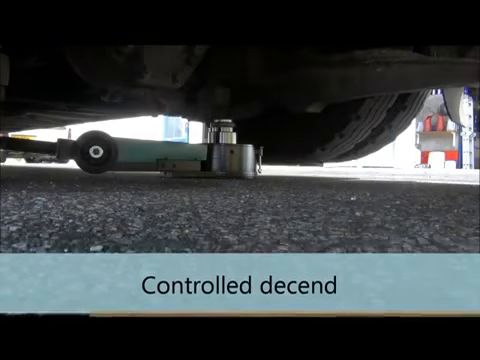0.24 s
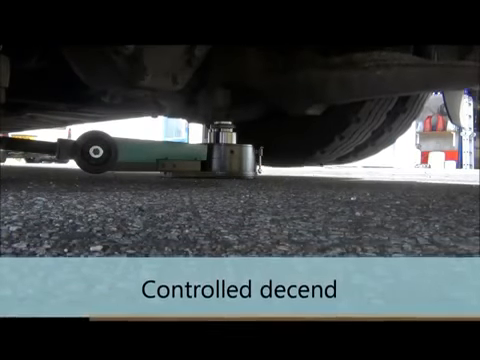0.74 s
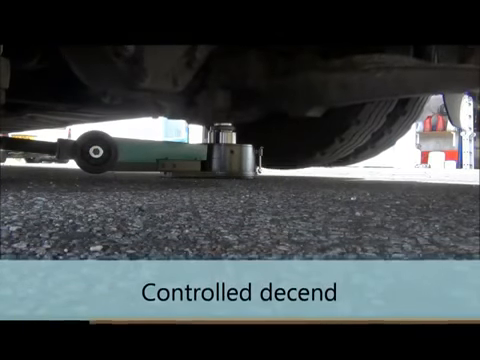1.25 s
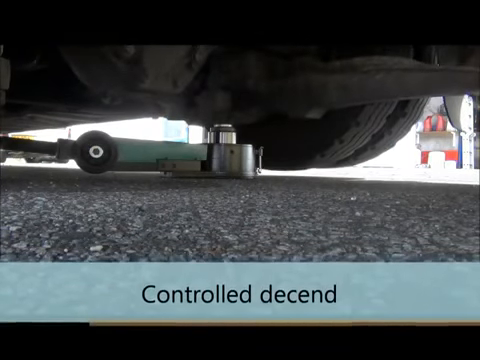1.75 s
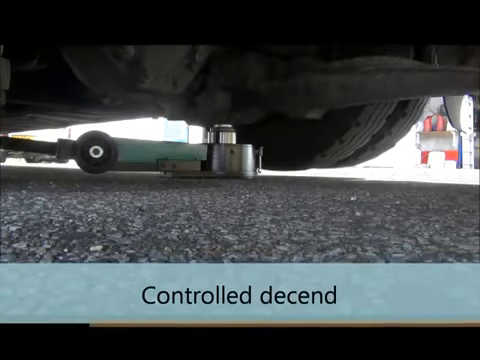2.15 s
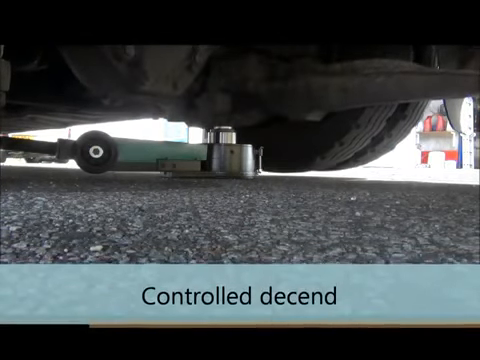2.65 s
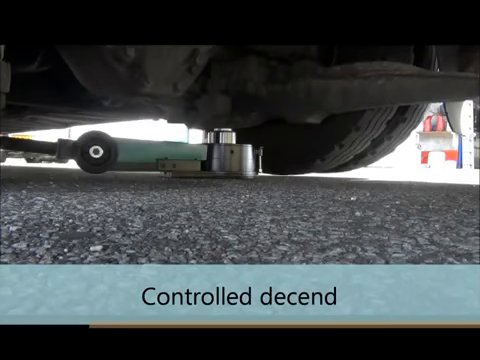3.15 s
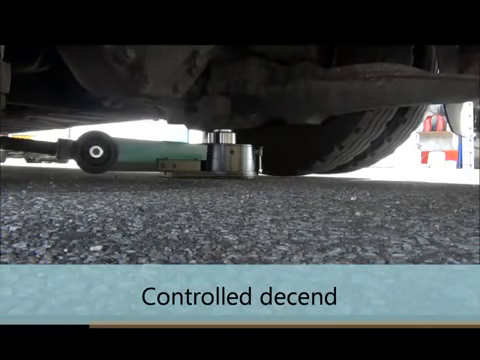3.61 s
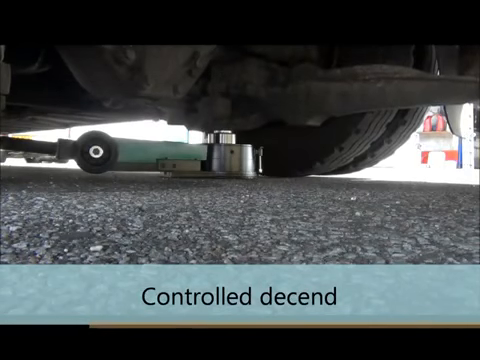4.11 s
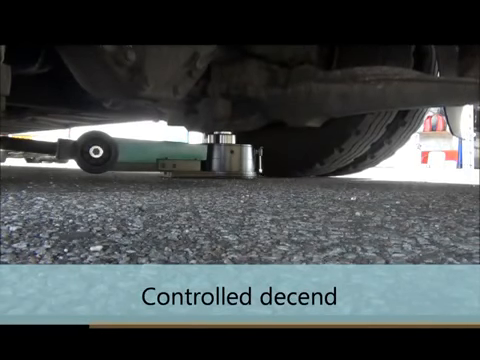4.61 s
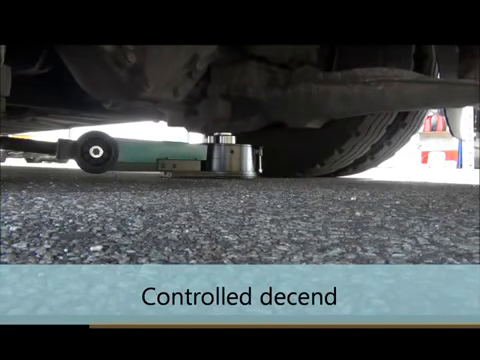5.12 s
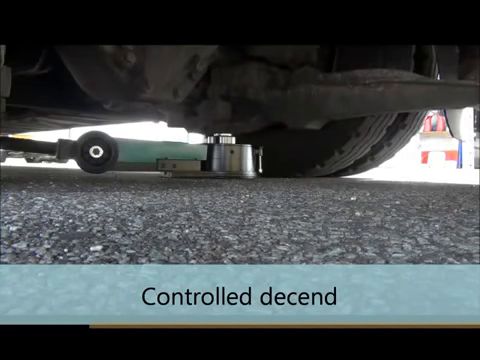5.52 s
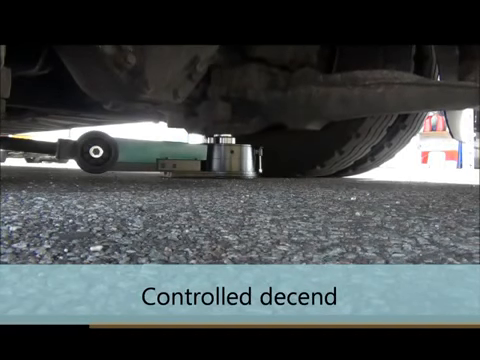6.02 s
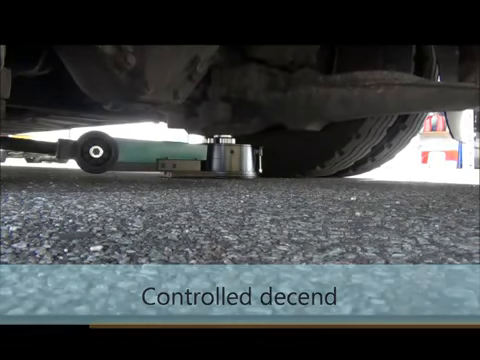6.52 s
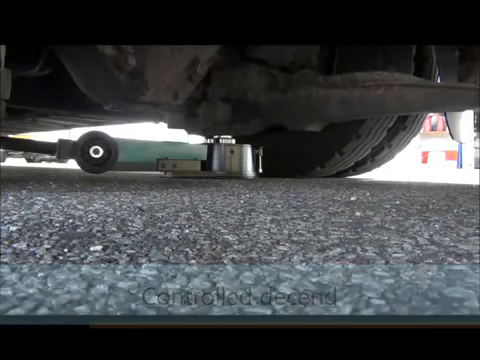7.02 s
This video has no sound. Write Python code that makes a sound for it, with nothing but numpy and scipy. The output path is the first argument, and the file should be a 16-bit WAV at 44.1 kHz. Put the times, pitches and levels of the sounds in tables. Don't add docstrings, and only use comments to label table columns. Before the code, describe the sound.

A bright, whistling air release close by stops for under half a second, returns, then grows fuller over a distant rising engine and tyre rumble.

```python
import sys
import numpy as np
from scipy import signal
from scipy.fft import rfft, irfft, next_fast_len
from scipy.io import wavfile
from scipy.ndimage import uniform_filter1d, map_coordinates

SR = 44100
rng = np.random.default_rng(int(sys.argv[2]) if len(sys.argv) > 2 else 0)


def digitize_waveform(pressure):
    field = np.atleast_2d(pressure).T
    bounded = np.clip(field, -1, 1)
    quanta = np.round(bounded * 32767).astype(np.int16)
    wavfile.write(sys.argv[1], SR, quanta)


def undo_db(level):
    steps = np.asarray(level, float) / 20
    return 10 ** steps


N = 320166
REOPEN_S = 2.202

# t/s, firing f/Hz, road and engine level/dB; at 3.1 s the low sound abruptly grows louder
PASS_BY = [(0, 86, -71), (.4, 88, -74.5), (1.1, 90.5, -69), (1.8, 94.8, -70), (3.1, 98.7, -66),
           (3.16, 98.9, -61), (3.7, 102, -59), (4.3, 103.3, -54), (5.4, 106.8, -54), (6.3, 106.6, -55),
           (7.26, 103, -60.5)]


def unit(x):
    return x / np.sqrt(np.mean(x ** 2) + 1e-20)


def along(points, hz):
    f, v = np.transpose(points)
    return np.interp(np.log(hz + 1), np.log(f + 1), v)


def curves(rows):
    s, *cols = np.transpose(rows)
    return [np.interp(np.arange(N) / SR, s, c) for c in cols]


def wobble(rate):
    knots = rng.standard_normal(int(N * rate / SR) + 4)
    return map_coordinates(knots, [np.arange(N) * rate / SR])


def swells(rows):
    t = np.arange(N) / SR
    return sum(undo_db(db) * np.exp(-((t - s) / width) ** 2) for s, db, width in rows)


def filtered(x, response):
    m = next_fast_len(N + SR // 2)
    return irfft(rfft(x, m) * response(np.fft.rfftfreq(m, 1 / SR)), m)[..., :N]


def patches(shape):
    field = uniform_filter1d(rng.standard_normal(shape), size=6, axis=0)
    return unit(uniform_filter1d(field, size=12, axis=1))


def rush(gain, alike, patchy_db, stray_db):
    z = signal.stft(rng.standard_normal((2, N + 512)), nperseg=512)[2]
    shared_db = patchy_db * patches(z.shape[1:])
    field = undo_db([shared_db, shared_db + stray_db * patches(z.shape[1:])])
    pair = signal.istft(z * field, nperseg=512)[1][:, :N]

    def split(hz):
        turn = np.arccos(np.clip(along(alike, hz), -1, 1)) / 2
        return gain(hz) * [np.cos(turn), np.sin(turn)]

    mid, side = filtered(pair, split)
    return unit(np.array([mid + side, mid - side]))


def tone(hz, db, drift):
    phase = 2 * np.pi * np.cumsum(hz * (1 + drift * wobble(12))) / SR
    return np.sqrt(2) * undo_db(db) * np.sin(phase)


def yard_floor():
    # f/Hz, level/dB per Hz
    floor_spectrum = [(300, -30), (420, -3), (600, -3), (850, -3.5), (1200, -4.5), (1700, -6), (2400, -11),
                      (3300, -13.5), (5800, -16), (7800, -14), (9500, -11.5), (13000, -12.5), (15000, -14)]
    # f/Hz, coherence
    floor_alike = [(400, .8), (1500, .72), (3000, .85), (7000, .6), (15000, .62)]
    t = np.arange(N) / SR
    creep_s, creep_rise_s = 1.73, 0.064
    raised = np.clip((t - creep_s) / creep_rise_s, 0, 1) * (t < REOPEN_S)
    floor = rush(lambda f: undo_db(along(floor_spectrum, f)), floor_alike, patchy_db=1.2, stray_db=1.5)
    return undo_db(-74 + 12 * raised) * floor


def far_machines():
    # start t/s, length/s, f/Hz, glide/(Hz per s), level/dB
    spells = [(0, .26, 151, -8, -75.5), (.31, .4, 124.5, 3.5, -64.5), (.72, .8, 126.5, -.5, -78),
              (1.546, 0.23, 125, -11, -62.5), (2.314, 1, 129, 2, -71.5), (3.25, 0.45, 127, -16, -64.5),
              (.22, 0.47, 372, 4, -72.5), (0.837, 0.57, 381, 9, -73), (2.327, .14, 387.5, 3, -70),
              (2.55, .6, 392.5, 13.5, -70.5), (3.143, .29, 397.5, -12, -55), (1.75, 0.6, 500, 13.5, -77.5)]
    t = np.arange(N) / SR
    edge_s = 0.051
    total = 0
    for start, length, hz, glide, db in spells:
        inside_s = np.minimum(t - start, start + length - t)
        gate = np.clip(inside_s / edge_s + .5, 0, 1)
        pitch = hz + glide * np.clip(t - start, 0, length)
        total = total + gate * tone(pitch, db + 2.2 * wobble(11), drift=0.0058)
    return total


def tyres():
    # f/Hz, level/dB per Hz
    roar_spectrum = [(110, -40), (140, 0.5), (250, 0.5), (360, 0), (430, -1.5), (480, -13), (900, -35)]
    # f/Hz, level/dB per Hz
    rumble_spectrum = [(15, -28), (30, -11), (60, -3.5), (85, -3.5), (130, -4.5), (170, -34)]
    # f/Hz, coherence
    road_alike = [(40, .98), (100, .98), (400, .94)]
    # t/s, peak level/dB, half width/s
    thumps = [
        (1.6, -69, 0.069),
        (1.8, -67, .07),
        (2.26, -66, 0.1),
        (3.42, -62, 0.046),
    ]
    pass_db = curves(PASS_BY)[1]
    road = undo_db(pass_db + .6 * wobble(4)) + swells(thumps)
    roar = rush(lambda f: undo_db(along(roar_spectrum, f)), road_alike, patchy_db=1.5, stray_db=3)
    rumble = rush(lambda f: undo_db(along(rumble_spectrum, f)), road_alike, patchy_db=.6, stray_db=3)
    return road * (roar + undo_db(-6 + .5 * wobble(4)) * rumble)


def engine():
    # t/s, peak level/dB, half width/s
    firing_swells = [(.5, -70, .1), (.92, -75, .1), (1.43, -64.5, 0.2), (1.83, -58, 0.11),
                     (2.08, -62.5, .15), (2.65, -72.5, 0.27), (3.47, -63, 0.18), (3.95, -58.5, .35),
                     (4.88, -49, 0.22), (5.2, -59, 0.073), (5.62, -61, 0.21), (5.9, -54, 0.12),
                     (6.15, -58, .1), (6.45, -59, 0.13), (6.72, -64, 0.098), (7.22, -62.5, .1)]
    # t/s, peak level/dB, half width/s
    low_swells = [(1.95, -69, 0.13), (2.25, -68, 0.11), (2.8, -72, .15), (3.45, -70, .1), (3.8, -64, .15),
                  (4.2, -69, 0.058), (5.15, -67, .2), (5.42, -62, 0.091), (6, -61, 0.33), (6.8, -67, .5)]
    # t/s, peak level/dB, half width/s
    second_swells = [(2.25, -73, .1), (2.7, -80, .12), (3.6, -70, 0.078), (4, -59.5, 0.15),
                     (4.35, -61, 0.082), (4.65, -63, .09), (5.1, -65, 0.09), (5.4, -65, .1),
                     (5.8, -59.5, 0.19), (6.12, -62, .1), (6.45, -64, 0.081)]
    hz, pass_db = curves(PASS_BY)
    swing_db = 5.5
    low = undo_db(pass_db - 17.5 + swing_db * wobble(5.4)) + swells(low_swells)
    second = undo_db(pass_db - 22 + swing_db * wobble(8.6)) + swells(second_swells)
    firing = undo_db(pass_db - 11.5) + swells(firing_swells)
    orders = firing * tone(hz, 0, drift=0.0042)
    orders = orders + low * tone(.75 * hz, 0, drift=0.01)
    orders = orders + second * tone(2 * hz, 0, drift=0.003)
    return orders * undo_db([[.7], [-.7]])


def underside(hz, depth_db):
    t = np.arange(SR // 20) / SR
    echoes = rfft(rng.standard_normal(len(t)) * undo_db(-60 * t / .07), SR).real
    reach = np.clip(hz / 5000, .1, 1) ** 2
    return undo_db(depth_db * reach * np.interp(hz, np.arange(len(echoes)), unit(echoes)))


def bands(hz):
    crossovers = [935, 3400, 7900]
    below = [1 / (1 + (hz / edge) ** 24) for edge in crossovers]
    return np.diff([0 * hz, *below, 1 + 0 * hz], axis=0)


def pipes(hz, state):
    # f/Hz, then level/dB per Hz barely open, warmed up, wide open, ram low
    jet_spectrum = [(500, -46, -44, -29, -28), (880, -53, -51, -38, -39.5),
                    (1300, -31.5, -32.5, -25.2, -21.7), (2000, -23.2, -23.7, -20.5, -18.4),
                    (3500, -26, -24.3, -18.3, -19.3), (5000, -21.2, -19.4, -18.2, -16.2),
                    (6000, -21, -20.4, -18.6, -17.5), (7600, -20.4, -19.9, -18.0, -18.3),
                    (8300, -15.2, -15.3, -19.9, -22.1), (9500, -16.9, -19.3, -19.4, -13.6),
                    (11300, -22.2, -19.0, -23.0, -14.8), (11700, -18.6, -18.0, -19.6, -15.9),
                    (13500, -18.3, -18.6, -18.6, -18.0), (15000, -20.0, -19.4, -22.9, -21.3)]
    # f/Hz, width/Hz, then level/dB over the jet in the four
    jack_modes = [(738, 44, 23, 23, 18.5, 16.5), (1018, 36, 21, 20.5, 19.5, 19),
                  (1202, 43, 9.7, 12.5, 11.6, 9.1), (1411, 27, 2.3, 9.4, 13.2, 10.0),
                  (1575, 30, 11.7, 12, 16.7, 17.6), (1850, 55, 8.4, 9.4, 12.8, 10.8),
                  (2242, 32, 13.3, 9.3, 11.7, 12), (2433, 24, 13.4, 8.6, 9.0, -0.2),
                  (2725, 43, 17.5, 6.5, 8.5, 7.3), (2969, 44, 14.9, 6.3, 7.3, 10.1),
                  (3280, 111, 8, 1.5, -0.5, -2),
                  (3660, 120, 8.1, 2.2, -6.0, -6.0), (4060, 70, 13.0, 4.5, 11.5, 11.6),
                     (4230, 38, 12.9, 8.8, 0.6, -6.0), (4430, 222, 6.5, 3.4, 4.5, 1.8),
                     (4940, 24, 1.7, -3.4, -3.5, -6.0), (5420, 178, 6.9, 2.8, 3, 1.5),
                     (6290, 66, 0.4, -6.0, 6.3, -0.8), (6800, 57, 5.2, -4.7, 2.9, 5.8),
                     (7030, 64, 6.4, 10.4, 8.5, -0.9), (7790, 104, 2.4, -6.0, -6.0, 8.3),
                  (8560, 347, 5.1, 3.9, 10.8, 12.1), (9350, 155, 11.1, 15.6, 14.9, 5.7),
                    (9690, 105, 14.7, 18.0, 14.1, 5.5), (9920, 195, 10.8, 11.4, 13.2, 3.6),
                    (10470, 246, 16.4, 17.6, 17.0, 10.6), (11010, 178, 17.1, 12.4, 16.9, 6.7),
                    (12090, 204, 0.3, 3.3, 3.9, 0.2), (12830, 91, 6.7, 2.8, -4.9, -4.9),
                    (13960, 79, 2.6, -1.8, -6.0, 6.8)]
    ring = 1
    for row in jack_modes:
        f, width = row[:2]
        ring = ring + undo_db(row[2 + state] + 1) ** 2 / (1 + (2.5 * (hz - f) / width) ** 2)
    jet_db = along([(250, -70)] + [(row[0], row[1 + state]) for row in jet_spectrum], hz)
    split = bands(hz) * undo_db(jet_db) * np.sqrt(ring) * (hz < 15020)
    return sum(unit(band) for band in split) * underside(hz, depth_db=2.1)


def flutter():
    surge = signal.lfilter([1], [1, -np.exp(-1 / (0.0047 * SR))], np.maximum(wobble(40) - .8, 0))
    return 0.29 * unit(surge - surge.mean()) + 0.16 * wobble(5.8) + 0.076 * wobble(300)


def valve_gate(fall):
    t = np.arange(N) / SR
    shut_s, seated_s, rise_s = 1.757, 1.812, .013
    since = np.maximum(t - shut_s, 0)
    leak = undo_db(-7)
    snap = (1 - leak) * undo_db(-1.9 * fall * since)
    linger = leak * undo_db(-fall * (0.58 * since + 0.8 * np.maximum(t - seated_s, 0)))
    rise = np.clip((t - REOPEN_S) / rise_s, 0, 1) ** 1.5
    return np.where(t < REOPEN_S, snap + linger, rise)


def valve():
    # t/s, state 0-3 (barely open, warmed up, wide open, ram low)
    states = [
        (0, 0),
        (.6, 0),
        (1.7, 1),
        (3.11, 1),
        (3.17, 2),
        (4.4, 2),
        (5.8, 3),
        (7.26, 3),
    ]
    # t/s, flow level/dB, opening (near 0 barely open, near 1 wide open)
    hand = [(0, -2.5, .3), (.5, -0.5, .25), (.9, -0.1, .15), (1.08, -0.7, 0.06), (1.28, 0.2, 0),
            (1.5, -0.1, -.2), (1.62, 0.3, .5), (1.76, -.5, 0.4), (2.3, 0, .2), (2.45, -0.5, -.15),
            (2.85, -0.3, -.1), (3.1, 0, -.2), (3.15, -1.5, 0.83), (3.45, 0.3, 0.62), (3.7, 0, .85),
            (4.45, .8, .9), (5.6, -.5, 1.05), (6.6, 0.76, 1.05)]
    # level/dB barely open, gain/dB wide open, fall/(dB per s) once shut
    parts = [
        (-66, 9.5, 110),
        (-49, 6.5, 200),
        (-44, 3.5, 297),
        (-34, -1.8, 346),
    ]
    # f/Hz, coherence
    jet_alike = [(450, .86), (800, .92), (1200, .988), (1800, .992), (3000, .991), (6000, .978),
                 (9000, .97), (14000, .82)]
    state, = curves(states)
    white = rush(np.ones_like, jet_alike, patchy_db=1, stray_db=0)
    air = 0
    for k in range(4):
        air = air + np.clip(1 - abs(state - k), 0, 1) * filtered(white, lambda f: pipes(f, k))
    flow_db, opening = curves(hand)
    total = 0
    for k, (db, wide_db, fall) in enumerate(parts):
        level = undo_db(db + wide_db * opening) * valve_gate(fall)
        total = total + level * filtered(air, lambda f: bands(f)[k])
    return undo_db(flutter() + flow_db) * total


def scene():
    return yard_floor() + far_machines() + tyres() + engine() + valve() * undo_db([[.1], [-.1]])


def low_pass(x):
    return signal.sosfilt(signal.butter(12, 15020, fs=SR, output="sos"), x)


def record(dry):
    return low_pass(dry)


dry = scene()
out = record(dry)
digitize_waveform(out)
```